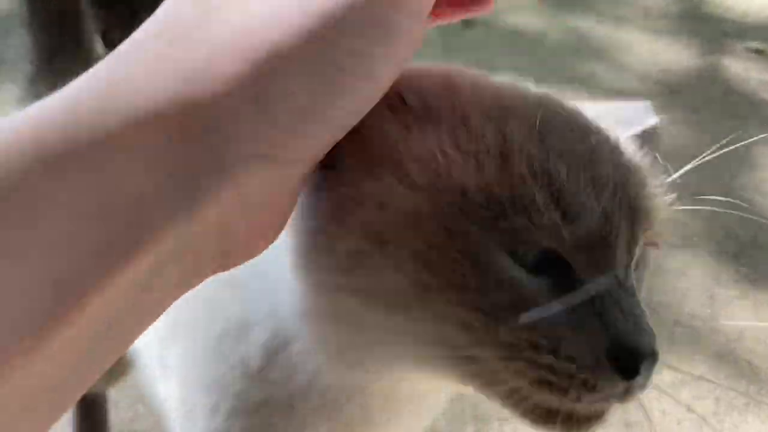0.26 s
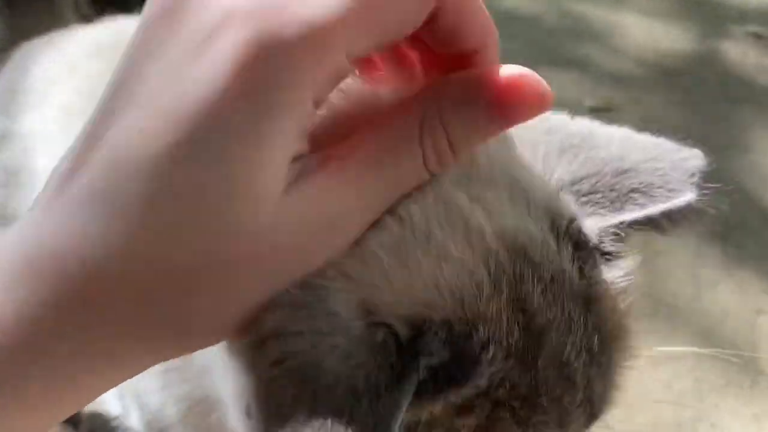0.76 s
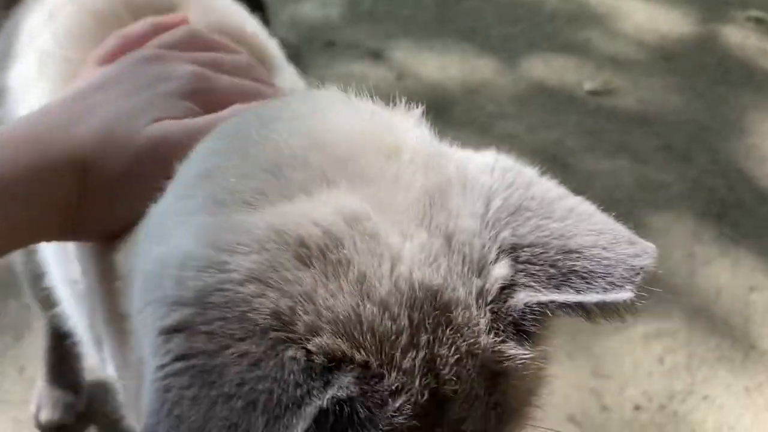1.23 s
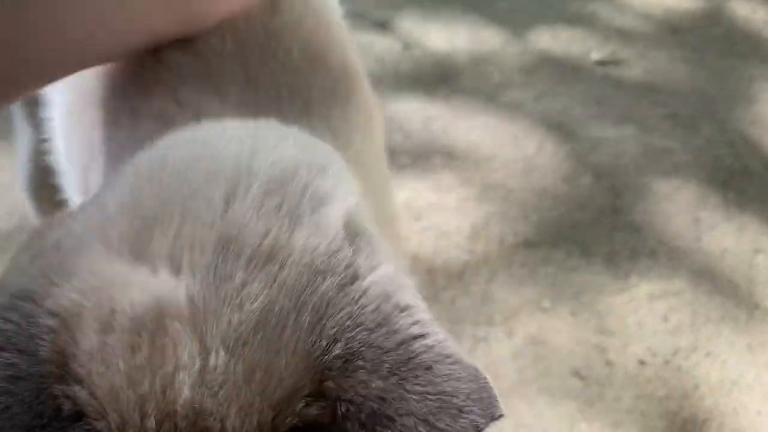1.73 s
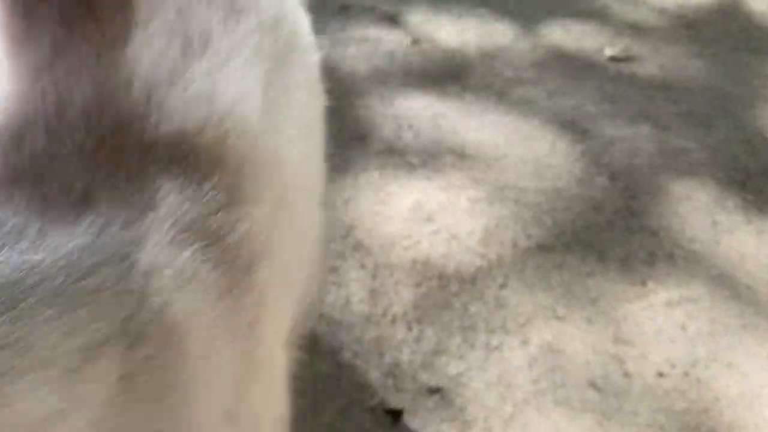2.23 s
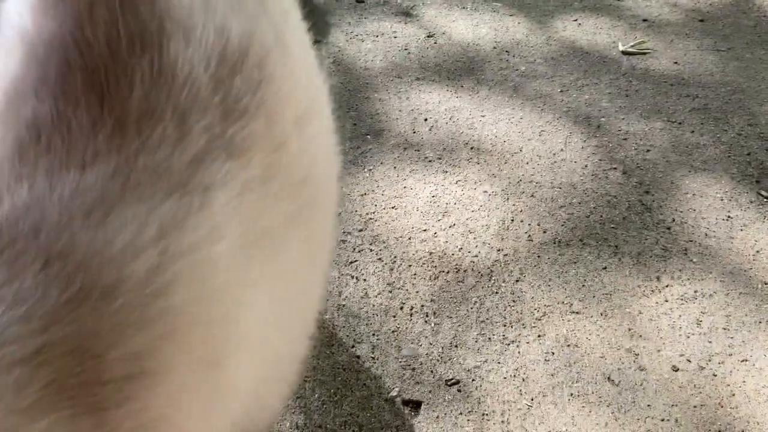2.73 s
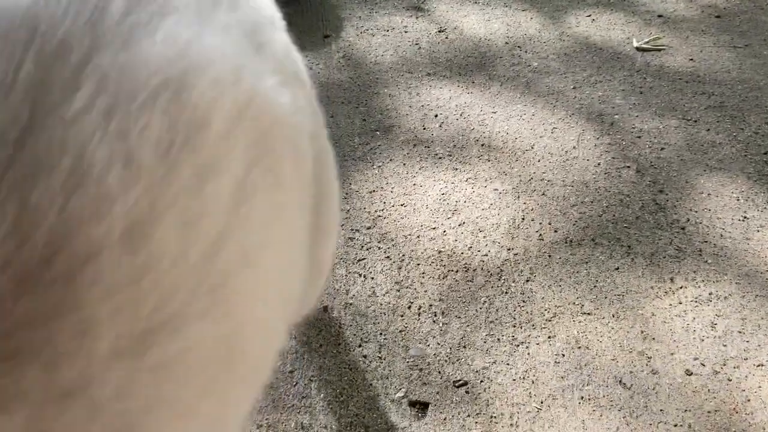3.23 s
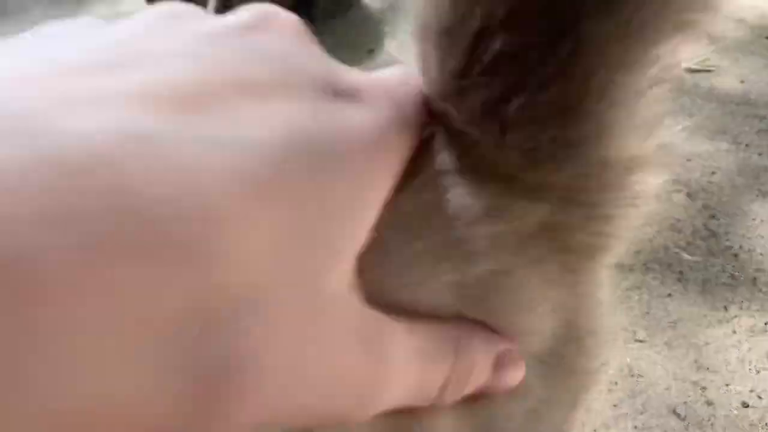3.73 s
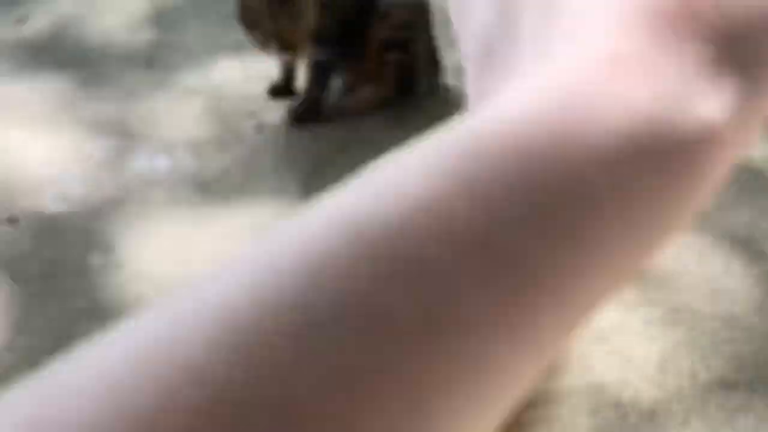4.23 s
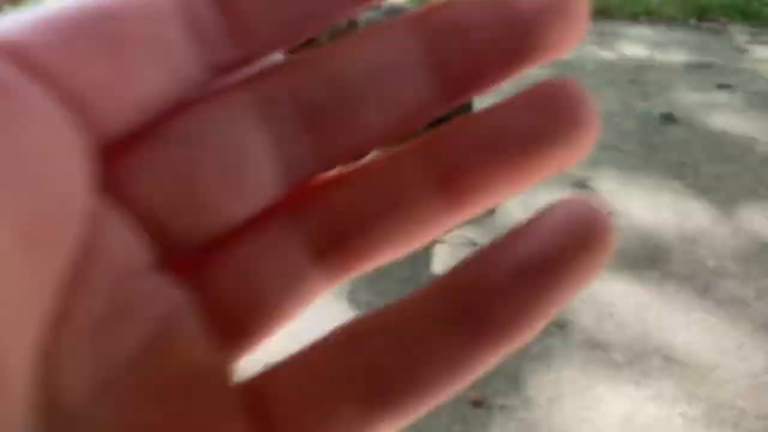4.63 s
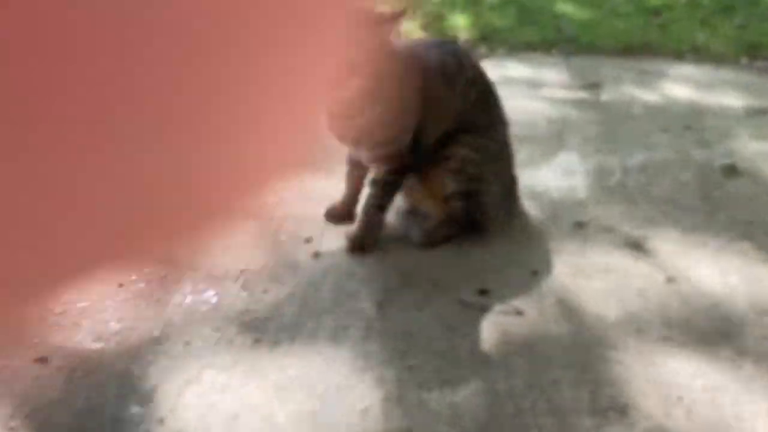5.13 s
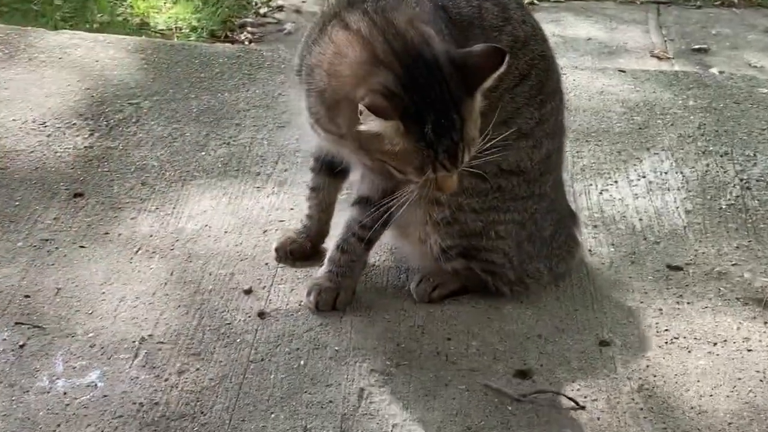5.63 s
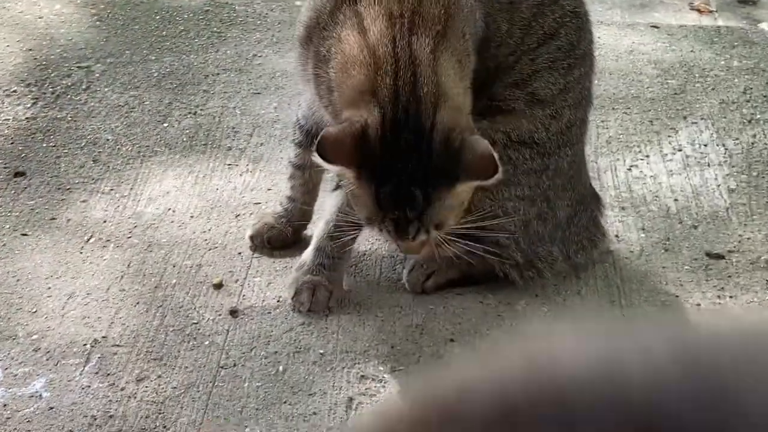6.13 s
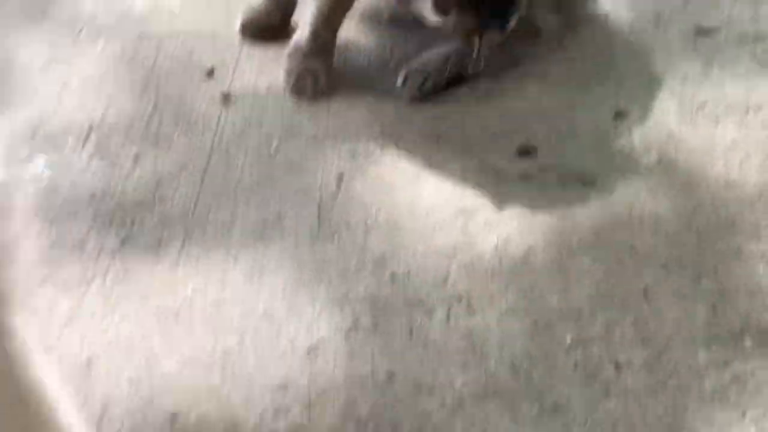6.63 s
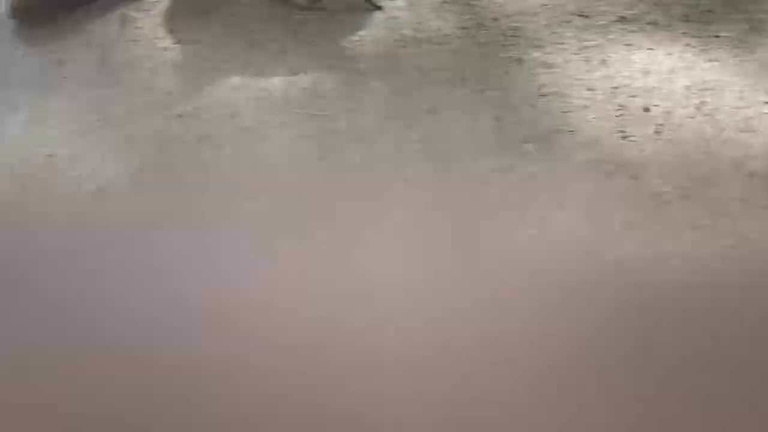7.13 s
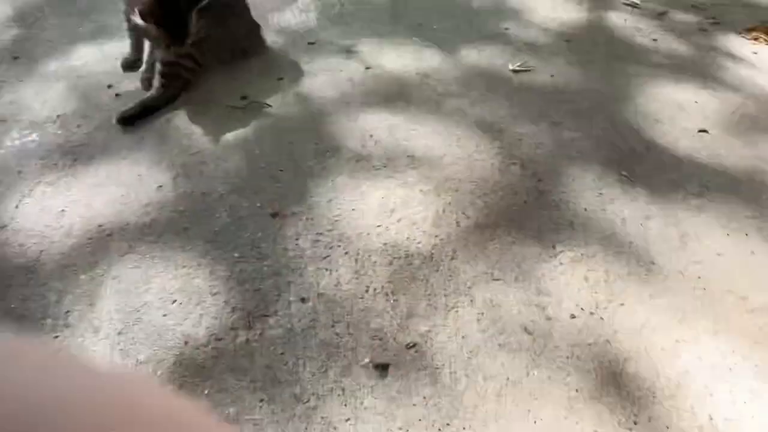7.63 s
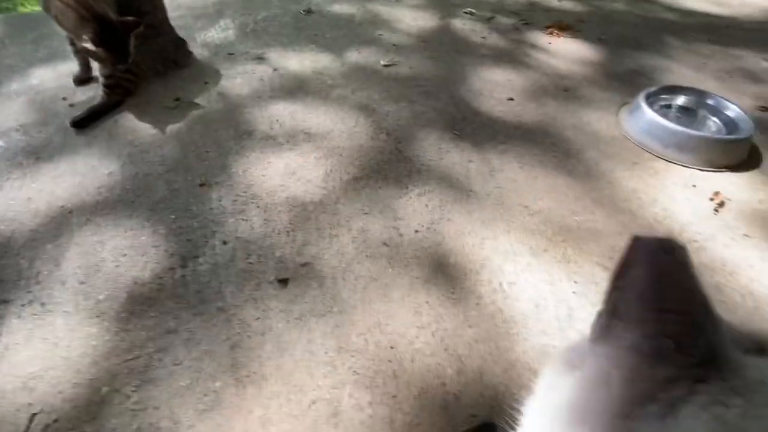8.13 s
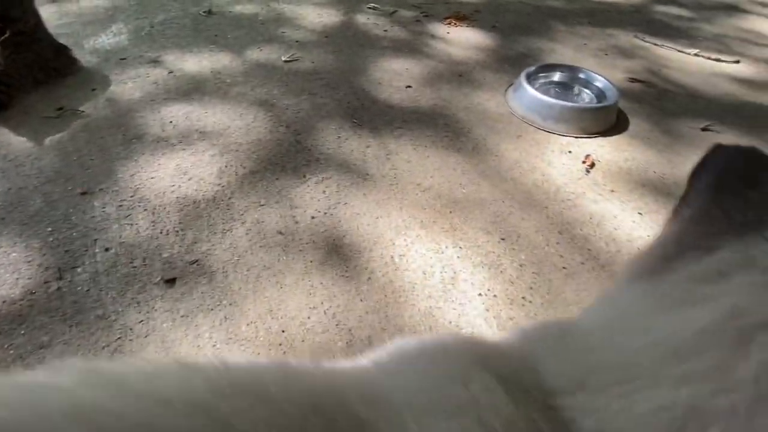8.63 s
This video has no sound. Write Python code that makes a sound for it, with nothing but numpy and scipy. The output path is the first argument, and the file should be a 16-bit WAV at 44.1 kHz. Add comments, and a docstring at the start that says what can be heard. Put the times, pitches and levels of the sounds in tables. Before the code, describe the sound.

A cat purrs close to the microphone on an outdoor path, a soft, low, fluttering rumble that is fullest around 1 second and swells gently as a hand strokes its fur. A distant small bird trills faintly near 0.8, 2.4 and 3.4 seconds. Between 4.6 and 5.1 seconds, fingers and fur bump the microphone with several dull thumps, tiny ticks and soft rustles. Paws scuff lightly on grit around 5.4 and 6.1 seconds. The purr dips near 6 seconds and returns by 6.7. The loudest thump lands at about 7.1 seconds, with a smaller one right after. Around 8 seconds there is a brief light rustle, then the purr comes in short, throatier pulses until the end. Throughout, faint cicadas buzz, surging more in the second half, with thin crickets, a fine hiss, and far traffic with a low machine hum.

```python
"""A shaded concrete path: a cat purrs close to the microphone while a hand strokes it.
Its larynx snaps about 28 times a second, ringing chest, flank and throat. Fingers and fur bump the
microphone amid soft rustles; paws scuff on grit. Behind are a small bird's trills, cicadas buzzing
their tymbals, a rasping insect, tree crickets, a fine hiss and far traffic with a machine's hum."""
import sys
import numpy as np
from scipy import signal
from scipy.fft import rfft, irfft, next_fast_len
from scipy.io import wavfile

SR = 44100
rng = np.random.default_rng(int(sys.argv[2]) if len(sys.argv) > 2 else 0)


def master(y):
    """Save y as 16-bit WAV."""
    cut = np.clip(np.atleast_2d(y).T, -1, 1)
    pcm = np.round(cut * 32767)  # scale
    wavfile.write(sys.argv[1], SR, pcm.astype(np.int16))


N = 391608

# swells of the purr: start_s, length_s, throat_db, flank_db
PURR_SWELLS = [(.376, 0.18, -60.5, -68.5), (1.7, 0.41, -68, -63.5), (2.449, 0.37, -73, -64),
               (2.95, 0.089, -68, -69), (3.853, 0.18, -71, -60.5), (4.549, 0.57, -73, -67),
               (5.599, 0.73, -88, -69), (6.662, 0.14, -65, -61.5), (7.972, 0.075, -61.5, -54),
               (8.151, 0.068, -60, -55), (8.297, 0.086, -62, -57.5), (8.543, .11, -64, -56.5)]


def purr(jitter_cycles=0.012, open_cycles=0.31):
    """The larynx snaps open and shut, driving the body; air rasps through the open gap."""
    cycles = larynx_cycles() + jitter_cycles * drift(14)
    snaps = np.diff(np.floor(cycles), prepend=0)
    uneven_snaps = snaps * from_db(2.5 * drift(14))
    closings = np.diff(np.floor(cycles + .5), prepend=0)
    uneven_closings = closings * from_db(5.3 * drift(14))
    air = rng.standard_normal(N) * np.exp(-(cycles % 1) / open_cycles)
    flank_drive = uneven_snaps + 0.59 * uneven_closings + 0.11 * air
    throat_drive = snaps * from_db(.8 * drift(14)) + .16 * closings + .026 * air
    throat_gain, flank_gain = purr_gains()
    body = chest(uneven_snaps) + flank(flank_drive, flank_gain)
    return body + throat(throat_drive, throat_gain) + nose(cycles)


def larynx_cycles():
    """Running count of snaps, aligned so that each swell starts on one."""
    # quickens under the first stroke, then settles: time_s, rate_hz
    snap_rate = [(0, 28), (.55, 27.4), (1.7, 31), (2.3, 27.2), (5.6, 28.4), (6.9, 25.6), (8.4, 28.2)]
    cycles = np.cumsum(in_time(snap_rate)[0]) / SR
    starts_s = np.array(PURR_SWELLS)[:, 0]
    short_of_snap = np.unwrap(-np.interp(starts_s, clock(), cycles) % 1, period=1)
    return cycles + np.interp(clock(), starts_s, short_of_snap)


def purr_gains(throat_quiet_db=-77, flank_quiet_db=-70):
    """Throat and flank swell together above their quiet levels."""
    throat_power, flank_power = from_db(throat_quiet_db) ** 2, from_db(flank_quiet_db) ** 2
    for start_s, length_s, throat_db, flank_db in PURR_SWELLS:
        shape = swell(start_s, length_s, attack_s=0.067, release_s=0.021)
        throat_power += (from_db(throat_db) * shape) ** 2
        flank_power += (from_db(flank_db) * shape) ** 2
    return np.sqrt(throat_power), np.sqrt(flank_power)


def chest(snaps, gain_db=-6.0):
    """Each snap thuds in the chest."""
    # chest resonances: pitch_hz, width_hz, gain_db
    modes = [(57.2, 20, 0.5), (88.5, 23, -3), (115.4, 43, -17), (151, 48, -20.5)]
    # greatest with the head near the microphone: time_s, level_db
    strength = [(0, -49), (1.07, -43.5), (1.35, -48), (1.85, -49), (2.4, -52), (3.5, -53), (4.3, -51),
                (5.3, -52), (5.75, -47), (6.1, -71), (6.7, -49.5), (7.9, -64), (8.5, -52.5), (8.88, -69)]
    thuds = rms_one(butter(resonate(snaps, modes), 2, [42, 300], "band"))
    return place(thuds * from_db(in_time(strength)[0] + gain_db), pan_db=-3.0, lag_ms=0.25)


def flank(drive, gain, trim_db=-2.5):
    """Uneven snaps and rasping air ring in the flank."""
    # flank resonances: pitch_hz, width_hz, gain_db
    modes = [(170.5, 29, 0), (236, 86, -2), (299.3, 71, -1), (380, 110, -4)]
    return place(soft_rings(drive, modes, shift=1) * gain * from_db(trim_db), pan_db=3.5, lag_ms=0.37)


def throat(drive, gain, pitch_spread=.04):
    """Clean, even snaps ring in the throat, each at a slightly different pitch."""
    # throat resonances: base_hz, width_hz, gain_db
    modes = [(250, 140, -10), (445, 140, -5), (539, 128, 0.5), (680, 410, -15.5), (1020, 340, -21)]
    # the mouth opens and closes, shifting them: time_s, pitch_ratio
    mouth = [(.36, 1.06), (.57, 0.81), (2, 1.016), (6.7, 1.05), (8.0, 1.03), (8.33, 1.03), (8.6, 1.08)]
    shift = in_time(mouth)[0] * (1 + pitch_spread * drift(20))
    return place(soft_rings(drive, modes, shift) * gain, pan_db=1.0, lag_ms=0.25)


def soft_rings(drive, modes, shift, step=7):
    """Soft tissue rounds each ring: it swells briefly, then dies; shift scales the pitches; rms 1."""
    slow_sr, slow_drive = SR / step, signal.resample_poly(drive, 1, step)
    out, warped_s = 0, np.cumsum(shift * np.ones(N))[::step] / SR
    for hz, width_hz, db in modes:
        r = np.exp(-np.pi * width_hz / slow_sr)
        carrier = np.exp(2j * np.pi * hz * warped_s)
        envelope = signal.lfilter([(1 - r) ** 2], [1, -2 * r, r * r], slow_drive * carrier.conj())
        out = out + from_db(db) * (carrier * envelope).real
    return rms_one(signal.resample_poly(out, step, 1)[:N])


def nose(cycles, level_db=-64, lead_cycles=0.18, leak=0.3):
    """With the face briefly at the microphone, air puffs from the nose just ahead of each snap."""
    air = np.zeros((2, N))
    add(air, 0, friction(centre_hz=2300, spread_oct=0.48, size=SR))
    puffs = leak + np.cos(np.pi * (cycles + lead_cycles)) ** 4
    nearness = swell(start_s=0.034, length_s=0.065, attack_s=0.016, release_s=0.055)
    return from_db(level_db) * nearness * puffs * air


def bumps(settle_s=0.004, softness=0.89, top_hz=340):
    """A soft touch on the microphone swells and dies while its pitch sinks."""
    # touches: start_s, level_db, final_hz, swell_s, onset_extra_hz
    touches = [(4.597, -33, 66, 0.018, 303), (4.632, -32, 78, 0.017, 120), (4.852, -30.5, 62.7, 0.017, 295),
               (5.066, -43.5, 79.5, 0.0063, 450), (5.441, -51, 168, 0.021, 60),
               (7.133, -19, 65.6, 0.015, 410), (7.26, -30, 61.4, 0.014, 180)]
    out, t = np.zeros(N), np.arange(SR // 8) / SR
    for start_s, db, final_hz, swell_s, extra_hz in touches:
        turns = final_hz * t + extra_hz * settle_s * (1 - np.exp(-t / settle_s))
        push = (t / swell_s * np.exp((1 - (t / swell_s) ** 2) / 2)) ** softness
        add(out, start_s, from_db(db) * push * np.sin(2 * np.pi * turns))
    return place(butter(out, 5, top_hz), pan_db=1.0, lag_ms=0.083)


def ticks(gain_db=-11.0, top_hz=5800):
    """Tiny dry contacts that die at once."""
    # handling and grit: start_s, level_db, centre_hz, decay_s
    contacts = [(2.014, -52, 3940, 0.013), (3.219, -51, 2740, .007), (4.588, -41.5, 750, .008),
                (4.8378, -48.5, 1400, 0.014), (4.848, -51, 2730, 0.011), (5.0684, -45.5, 1200, 0.012),
                (5.091, -40.5, 4000, 0.0084), (6.886, -50, 850, 0.014), (6.951, -51, 2200, .007),
                (7.129, -41, 1000, 0.0041), (7.2533, -43.5, 1040, .006), (7.825, -48, 1492, 0.0055),
                (6.112, -50.5, 1500, 0.0082), (6.222, -51, 4050, .007), (7.969, -49, 1800, 0.0097),
                (8.0681, -43, 4560, .005)]
    out, t = np.zeros((2, N)), np.arange(SR // 20) / SR
    for start_s, db, hz, decay_s in contacts:
        burst = friction(hz, spread_oct=0.89, size=len(t))
        add(out, start_s, from_db(db + gain_db) * np.exp(-t / decay_s) * burst)
    return butter(out, 4, top_hz)


def rustles(gain_db=3.5):
    """Soft rustles, and the brief ring and tail of gritty scuffs; each swells, crackles and fades."""
    # friction bursts: middle_s, level_db, centre_hz, spread_oct, spread_s
    bursts = [(0.925, -74.5, 3480, 1.5, 0.069), (2.161, -71.5, 2340, 0.5, 0.039),
              (3.05, -76.5, 2530, 0.32, 0.088), (3.749, -74.5, 2740, 0.67, 0.061),
              (4.565, -66, 1610, 0.25, 0.016), (4.611, -66.5, 1100, 1.34, 0.053),
              (4.628, -74.5, 10500, 0.64, 0.09), (4.719, -72, 1390, 1.2, 0.073),
              (5.441, -71, 1220, 0.07, 0.016), (6.14, -74.5, 3200, 0.22, 0.06),
              (6.242, -75.5, 3950, 0.55, 0.15), (7.149, -68, 2160, 1.9, 0.041),
              (7.857, -66, 8650, 0.16, 0.08), (7.959, -54, 12500, 0.56, 0.017),
              (8.061, -60.5, 8860, 0.17, 0.012), (7.854, -72.5, 3600, 0.97, 0.024),
              (7.897, -73, 1480, 0.8, 0.031), (7.944, -68.5, 4280, 0.82, 0.032),
              (8.013, -75, 1310, 0.57, 0.014), (8.095, -66.5, 1367, 0.42, 0.015),
              (8.119, -69, 1700, 1.1, 0.058)]
    out, t = np.zeros((2, N)), np.arange(-SR // 3, SR // 3) / SR
    for middle_s, db, hz, spread_oct, spread_s in bursts:
        add(out, middle_s + t[0], from_db(db) * hump(t / spread_s) * friction(hz, spread_oct, len(t)))
    crackle_db = 3 * drift(350).clip(-2, 2.5)
    grain_db = 0.5 * drift(60)
    return out * from_db(grain_db + crackle_db + gain_db)


def scuffs(grains_per_s=2500, size_step_db=-6.0, gain_db=1.2, own_width_hz=220, own_db=5.0):
    """Grit cracks under a paw in a short dense cluster, each scuff with its own colour."""
    # paws on concrete: peak_s, level_db, rise_s, fall_s, low_hz, pitch_ratio, own_mode_hz
    steps = [(4.382, -63, .008, .025, 1200, .99, 3220), (5.441, -52.5, .008, .012, 600, 1.0, 4480),
             (6.06, -52, .008, .018, 1500, .92, 2300), (6.88, -61, .008, .028, 600, 1.0, 2100)]
    # grit resonances: base_hz, width_hz, gain_db
    grit = [(1170, 150, 7), (2460, 170, 4.5), (3340, 98, 10), (3595, 54, 13.5), (4440, 670, -1),
            (5300, 1100, -1.5)]
    out, t = np.zeros(N), np.arange(-SR // 8, SR // 4) / SR
    for peak_s, db, rise_s, fall_s, low_hz, ratio, own_hz in steps:
        sizes = from_db(size_step_db * np.minimum(rng.exponential(1, len(t)), 3))
        signs = rng.choice([-1, 1], len(t))
        grains = sizes * signs * (rng.random(len(t)) < grains_per_s / SR)
        modes = [(hz * ratio, width_hz, mode_db) for hz, width_hz, mode_db in grit]
        modes.append((own_hz, own_width_hz, own_db))
        cracks = sum(resonate(rng.permutation(grains), [mode]) for mode in modes)
        dulled = rms_one(butter(cracks, 4, 6000))
        envelope = from_db(db + gain_db) * np.exp(np.minimum(t / rise_s, -t / fall_s))
        add(out, peak_s + t[0], envelope * butter(dulled, 2, low_hz, "high"))
    return place(out, pan_db=0.5, lag_ms=0.006)


def bird(notes_per_s=31.2, upper_ratio=1.4, upper_db=-9.5):
    """A far bird's quick trills of hoarse, gliding notes, with a faint higher voice."""
    # trills: start_s, length_s, level_db, first_hz, last_hz, hoarseness_hz
    trills = [(0.765, 0.19, -70.5, 3140, 3150, 150), (2.335, 0.24, -62, 3500, 3260, 121),
              (2.496, 0.2, -65.5, 3210, 3040, 166), (3.359, 0.2, -70, 3270, 3100, 151)]
    out, waver = np.zeros(N), drift(300)
    strength = from_db(2 * drift(15))
    for start_s, length_s, db, first_hz, last_hz, hoarse_hz in trills:
        t = np.arange(int(length_s * SR)) / SR
        span = int(start_s * SR) + np.arange(len(t))
        notes = np.sin(np.pi * notes_per_s * t) ** 4 + 0.15
        phase = phase_of(first_hz + (last_hz - first_hz) * t / length_s + hoarse_hz * waver[span])
        voices = np.sin(phase) + from_db(upper_db) * np.sin(upper_ratio * phase)
        arch = np.sin(np.pi * t / length_s) ** 0.37
        add(out, start_s, from_db(db) * arch * notes * voices * strength[span])
    return place(out, pan_db=-0.5, lag_ms=0.34)


def cicadas(ring_gain_db=-1.5, surge_spread_s=0.05):
    """One cicada rings in surges; others whirr above it and swell at their own pace."""
    # tymbal resonances: centre_hz, width_hz, gain_db, buzz_hz
    ring_modes = [(6388, 130, -4.5, 46), (6528, 95, -5, 66), (6236, 300, -9, 120)]
    whirr_modes = [(6850, 420, -4, 39), (7330, 480, -4.5, 78), (7800, 480, -6, 100), (8150, 480, -5.5, 120)]
    # strength of each song: time_s, level_db
    ring_level = [(0, -68), (4.1, -68.5), (4.7, -66.5), (5.3, -62.5), (6.3, -63.5), (6.55, -66.5),
                  (7.05, -67), (7.45, -61.5), (7.85, -65), (8.25, -66), (8.88, -67)]
    whirr_level = [(0, -63), (.11, -66.5), (.2, -68.5), (2.4, -68.5), (3.02, -66), (3.2, -69), (4.4, -68.5),
                   (4.92, -63.5), (5.52, -68), (5.62, -66), (5.82, -64), (6.0, -67), (6.58, -67.5),
                   (6.7, -64), (6.95, -65.5), (7.2, -68), (7.75, -62), (8.05, -66), (8.3, -66), (8.68, -63),
                   (8.88, -66)]
    # surges of the ring: middle_s, rise_db
    surges = [(.14, 4.5), (.54, 4), (1.1, 2), (1.7, 4.5), (2.07, 4), (2.6, 3.5), (3.83, 3.5), (4.25, 4),
              (5.15, 3.5), (5.44, 4), (5.73, 4.5), (6.02, 3.5), (6.38, 7), (6.71, 3), (6.97, 3.5),
              (7.3, 3.5), (7.52, 3), (7.76, 7), (8.02, 4.5)]
    surge_db = sum(db * hump((clock() - s) / surge_spread_s) for s, db in surges)
    ring = from_db(in_time(ring_level)[0] + surge_db + ring_gain_db) * tymbals(ring_modes)
    return ring + from_db(in_time(whirr_level)[0]) * tymbals(whirr_modes)


def tymbals(modes, buzz_depth=0.19, waver_db=1.5):
    """Each tymbal resonance is a throbbing noise band; mid signal at rms 1."""
    # the buzz's stereo width drops to mono for about two seconds: time_s, side_db
    stereo_width = [(0, 7.5), (5.0, 8), (5.25, -36), (7.55, -28), (7.7, 16.5), (8.88, 21)]
    chorus = 0
    for hz, width_hz, db, buzz_hz in modes:
        throb = 1 + buzz_depth * np.sin(phase_of(buzz_hz * (1 + 0.0363 * drift(3))))
        chorus = chorus + from_db(db + waver_db * drift(6.7)) * throb * band(hz, width_hz)
    mid = chorus.mean(axis=0)
    return (mid + (chorus - mid) * from_db(in_time(stereo_width)[0])) / mid.std()


def rasping_insect(chirp_db=-80.5, rasp_db=-4.5, chorus_db=-82.5, growth_db_per_s=0.61, pan_db=1.5):
    """Far chirps, each a narrow note with a raspy skirt, over a faint chorus; both grow louder."""
    # nearly even chirps: middle_s
    chirps = [.51, .89, 1.23, 1.62, 2.0, 2.37, 2.7, 3.02, 3.37, 3.74, 4.09, 4.47, 4.85, 5.21, 5.58, 5.95,
              6.3, 6.7, 7.1, 7.45, 7.84, 8.2, 8.56]
    beats = sum(hump((clock() - s) / 0.047) for s in chirps)
    note = band(centre_hz=4690, width_hz=130)
    voice = note + from_db(rasp_db) * band(centre_hz=4600, width_hz=380)
    chorus = from_db(chorus_db) * band(centre_hz=4620, width_hz=570)
    gain = from_db(growth_db_per_s * clock() + np.array([[pan_db], [-pan_db]]) / 2)
    return gain * (from_db(chirp_db) * beats * voice + chorus)


def crickets(quiet_db=-85, fade_s=.03):
    """Tree crickets: two thin notes, roughened by uneven wing strokes, swell in trills."""
    # wing notes: pitch_hz, gain_db
    notes = [(2737, 0), (2679, -8)]
    # trills: start_s, length_s, level_db
    trills = [(2.114, 1.2, -82.5), (3.72, 0.38, -82), (4.3, 0.45, -83.5), (4.86, 0.4, -81.5),
              (8.32, 0.16, -81), (8.68, 0.2, -81)]
    song = 0
    for hz, db in notes:
        strokes = from_db(db + 2.8 * drift(45) + 1.3 * drift(4))
        song = song + strokes * np.sin(phase_of(hz + 7 * drift(20) + 10 * drift(70)))
    swells = sum(from_db(db) * swell(s, length_s, fade_s, fade_s) for s, length_s, db in trills)
    return place(np.hypot(from_db(quiet_db), swells) * rms_one(song), pan_db=-1.5, lag_ms=0.38)


def hiss(gain_db=3.5):
    """A fine mono hiss swells and fades in the top treble."""
    # hiss spectrum: freq_hz, density_db
    spectrum = [(8500, -5.5), (10000, 4), (11700, 5.5), (13200, 6), (15000, 3), (16000, 3)]
    # hiss strength: time_s, level_db
    strength = [(0.0, -88), (0.5, -76), (1.8, -74), (2.45, -76), (2.87, -81), (3.86, -71), (5.1, -83),
                (5.84, -79.5), (6.45, -79), (7.4, -71.5), (8.88, -73.5)]
    waver_db = 1.1 * drift(5) + drift(25)
    gain = from_db(in_time(strength)[0] + gain_db + waver_db)
    return gain * noise(lambda hz: from_db(at_hz(spectrum, hz)))[0]


def traffic_and_hum(rumble_db=-54.5):
    """Far traffic rumbles under a machine's wavering hum and an engine's drone."""
    # rumble spectrum: freq_hz, density_db
    spectrum = [(20, -22), (32, -8), (45, -7), (65, 0.5), (100, -3), (140, -6), (210, -12), (320, -11.5),
                (450, -19.5), (800, -28), (1600, -34), (3200, -38), (5500, -50.5), (16000, -96)]
    # machine hum: pitch_hz, level_db
    machine = [(108, -60.5)]
    # the engine grows and falls away: time_s, pitch_hz, level_db
    engine = [(0, 164.6, -73), (5, 168.2, -74.5), (6.15, 169.4, -72), (6.38, 168.7, -58.5),
              (6.6, 166.7, -66), (7.4, 167.8, -65), (7.7, 140.6, -70), (8.88, 160, -68.5)]
    hum = 0
    for pitch_hz, db in machine + [in_time(engine)]:
        amplitude = np.sqrt(2) * from_db(db + drift(2.0))
        hum = hum + amplitude * np.sin(phase_of(pitch_hz + 0.79 * drift(2.2)))
    rumble = from_db(rumble_db + 1.51 * drift(5.5)) * noise(lambda hz: from_db(at_hz(spectrum, hz)))
    return rumble + place(hum, pan_db=-6.0, lag_ms=0.058)


def noise(colour, size=N):
    """Stereo noise shaped by the gain colour(hz); rms 1."""
    # left-right likeness: freq_hz, correlation
    likeness = [(60, 0.88), (130, 0.75), (290, 0.74), (640, 0.26), (1400, -0.2), (2600, 0.18), (4600, 0.7),
                (6400, 0.96), (7000, 0.97), (8300, 0.99), (10000, 0.99), (15000, 0.17)]
    padded = next_fast_len(size, True)
    hz = np.fft.rfftfreq(padded, 1 / SR)
    mid, side = rfft(rng.standard_normal((2, padded))) * colour(hz)
    alike = at_hz(likeness, hz)
    spectra = np.sqrt(1 + alike) * mid + np.sqrt(1 - alike) * side * [[1], [-1]]
    return rms_one(irfft(spectra, padded)[:, :size])


def band(centre_hz, width_hz):
    """Noise in one resonance."""
    return noise(lambda hz: 1 / (1 + 2 * ((hz - centre_hz) / width_hz) ** 2))


def friction(centre_hz, spread_oct, size):
    """Friction noise: a spectral hump round its centre."""
    return noise(lambda hz: hump(np.log2((hz + 1) / centre_hz) / spread_oct), size)


def resonate(x, modes):
    """Parallel resonances of alternating sign."""
    out = 0
    for k, (hz, width_hz, db) in enumerate(modes):
        r = np.exp(-np.pi * width_hz / SR)
        forward = np.array([1, 0, -1]) * (1 - r * r) / 2
        feedback = [1, -2 * r * np.cos(2 * np.pi * hz / SR), r * r]
        out = out + (-1) ** k * from_db(db) * signal.lfilter(forward, feedback, x)
    return out


def butter(x, order, edge_hz, kind="low"):
    return signal.sosfilt(signal.butter(order, edge_hz, kind, fs=SR, output="sos"), x)


def place(x, pan_db, lag_ms):
    """Sound reaches the right channel later; positive pan_db favours the left."""
    late = np.interp(clock() - lag_ms / 1000, clock(), x)
    return np.array([x * from_db(pan_db / 2), late * from_db(-pan_db / 2)])


def add(out, start_s, sound):
    at = round(start_s * SR)
    first, last = max(at, 0), min(at + sound.shape[-1], N)
    out[..., first:last] += sound[..., first - at:last - at]


def drift(rate_hz):
    """Smooth random wander up to about rate_hz; spread 1."""
    knots = rng.standard_normal(int(2 * rate_hz * N / SR) + 4)
    smooth = signal.resample(knots, 8 * len(knots))
    return np.interp(np.linspace(0, len(smooth) - 1, N), np.arange(len(smooth)), smooth)


def swell(start_s, length_s, attack_s, release_s):
    """Rise before the start, hold at 1, die away."""
    t = clock() - start_s
    return np.exp(np.minimum(t / attack_s, (length_s - t) / release_s).clip(-30, 0))


def in_time(rows):
    """One per-sample curve for each column after time_s."""
    time_s, *columns = np.transpose(rows)
    return [np.interp(clock(), time_s, column) for column in columns]


def at_hz(points, hz):
    """Read a spectrum on a log-frequency axis."""
    freq_hz, value = np.transpose(points)
    return np.interp(np.log(hz + 1), np.log(freq_hz), value)


def hump(x):
    return np.exp(-x ** 2 / 2)


def phase_of(hz):
    return 2 * np.pi * np.cumsum(hz) / SR


def from_db(db):
    return 10 ** (np.asarray(db) / 20)


def rms_one(x):
    return x / np.sqrt(np.mean(x ** 2) + 1e-20)


def clock():
    return np.arange(N) / SR


def scene():
    """Cat and hand in front, the garden behind."""
    near = purr() + bumps() + ticks() + rustles() + scuffs()
    return near + bird() + cicadas() + rasping_insect() + crickets() + hiss() + traffic_and_hum()


def record(dry, lag_from_hz=6970, hz_per_turn=4060, cutoff_hz=15900):
    """The left channel's phase lags in the high treble, widening the hiss; the top is cut steeply."""
    padded = next_fast_len(N, True)
    turns = np.maximum(np.fft.rfftfreq(padded, 1 / SR) - lag_from_hz, 0) / hz_per_turn
    left = irfft(rfft(dry[0], padded) * np.exp(-2j * np.pi * turns), padded)[:N]
    return signal.sosfilt(signal.ellip(10, .1, 80, cutoff_hz, fs=SR, output="sos"), [left, dry[1]])


dry = scene()
out = record(dry)
master(out)
```